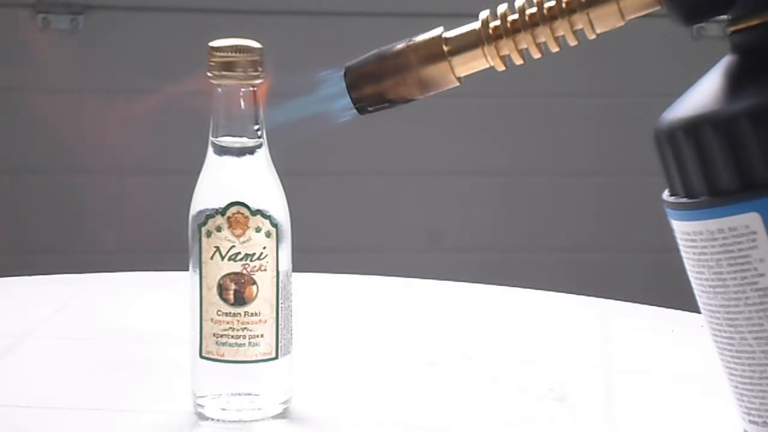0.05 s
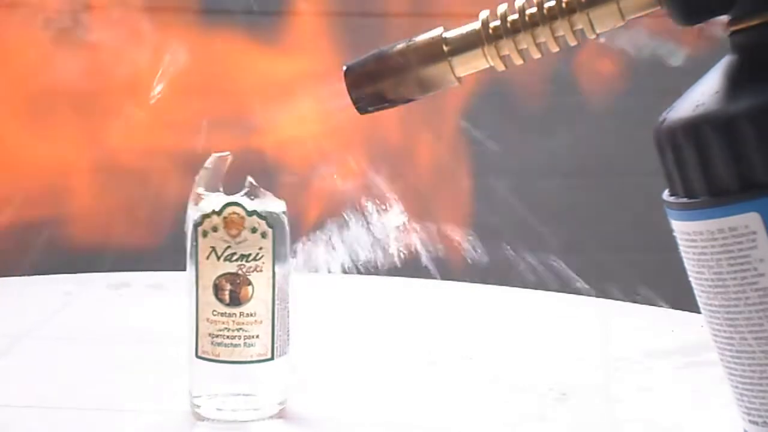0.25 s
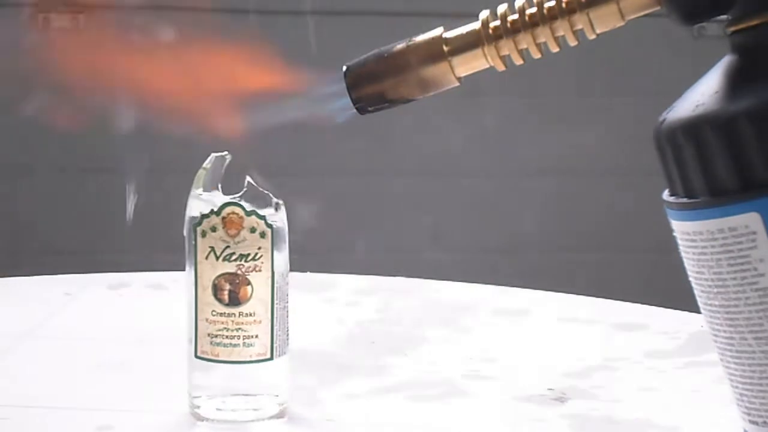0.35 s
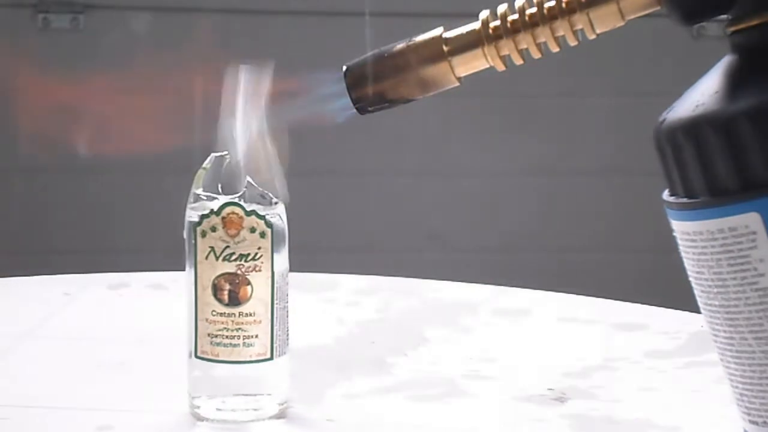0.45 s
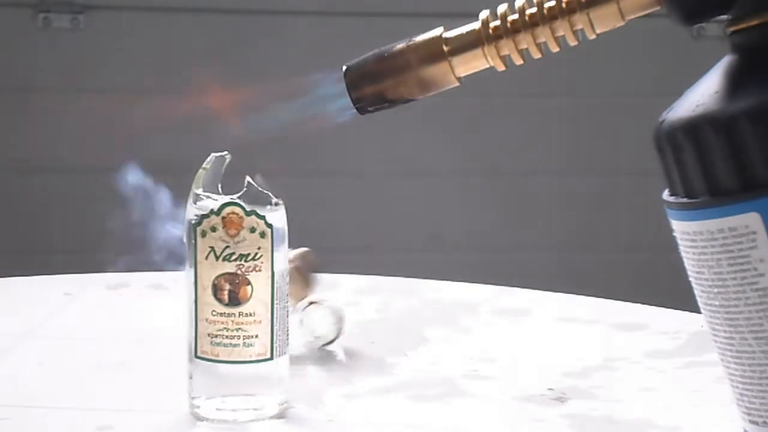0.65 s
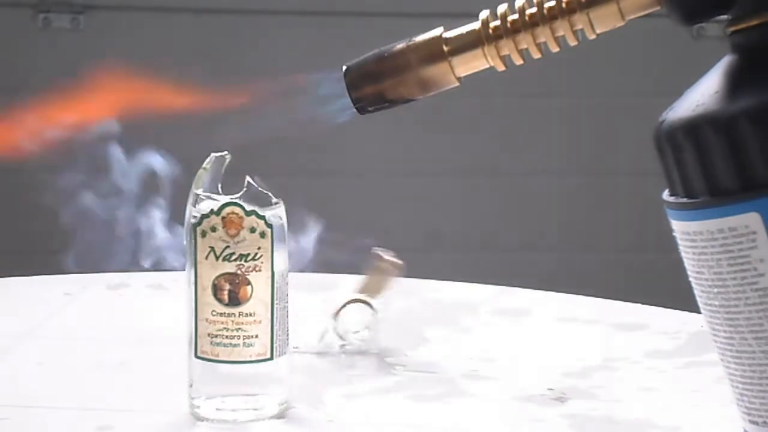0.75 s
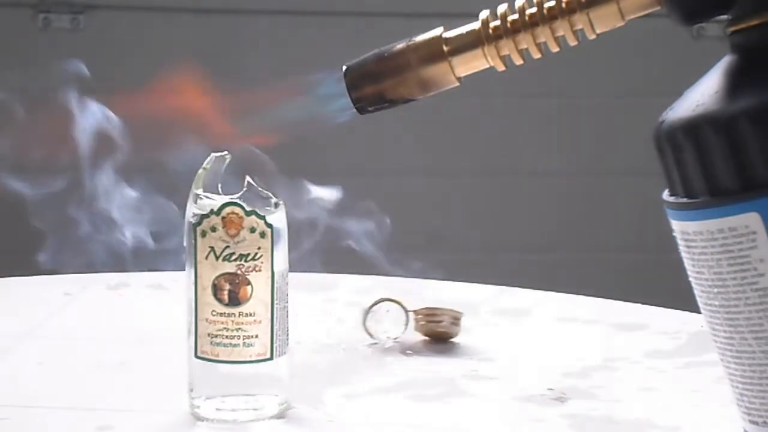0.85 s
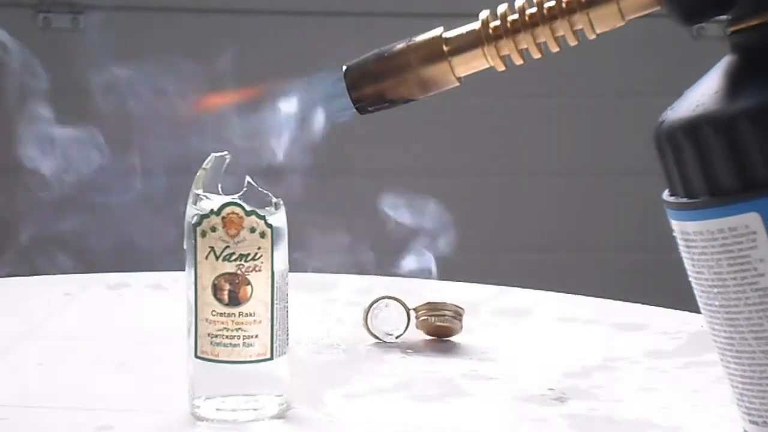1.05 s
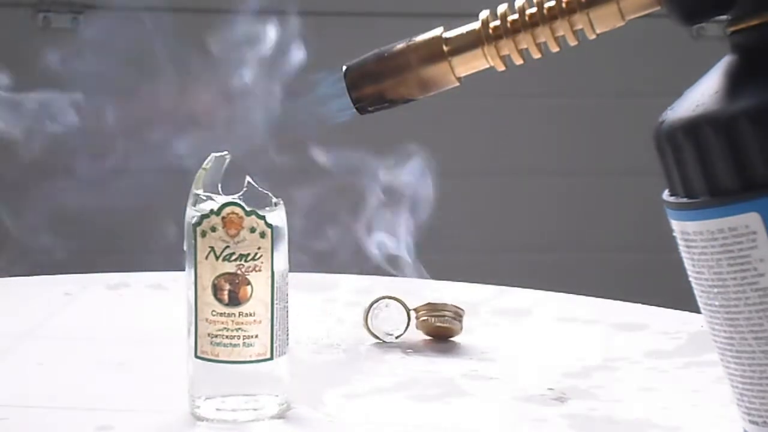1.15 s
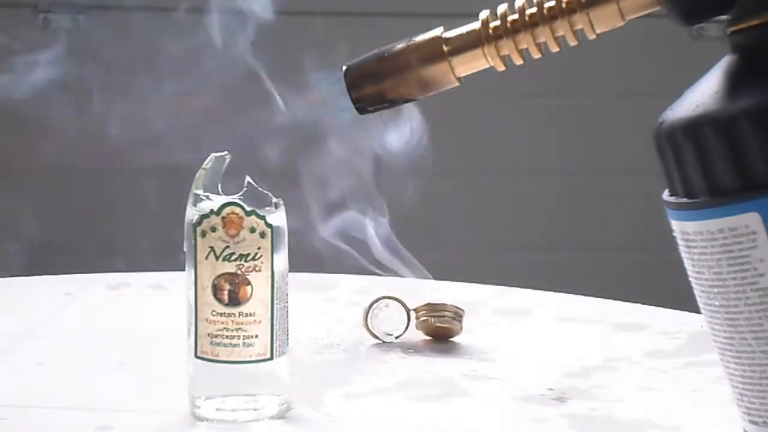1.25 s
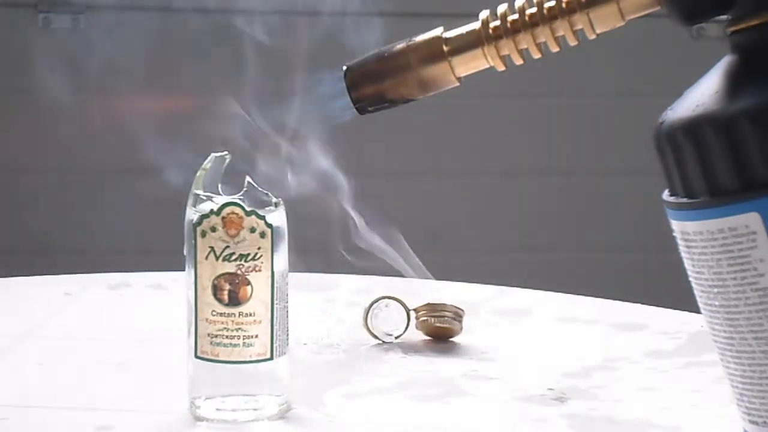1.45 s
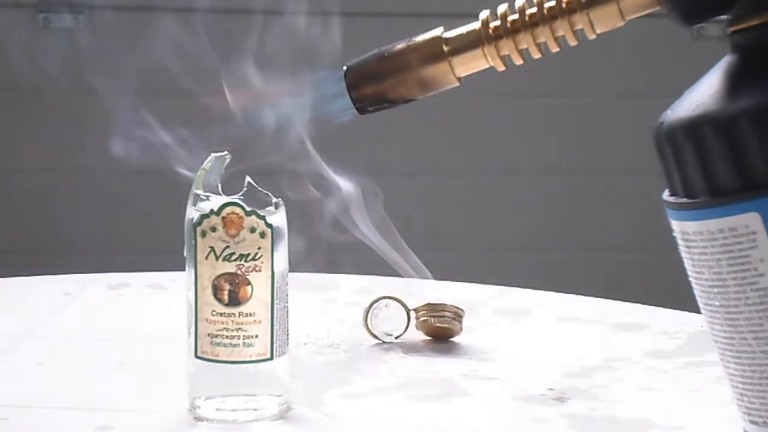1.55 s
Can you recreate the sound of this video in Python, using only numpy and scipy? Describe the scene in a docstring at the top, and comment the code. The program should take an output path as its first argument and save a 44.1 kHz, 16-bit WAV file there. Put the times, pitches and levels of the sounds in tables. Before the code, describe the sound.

One loud bang of bursting glass interrupts a softly roaring gas torch and echoes briefly through the room. Shards tick, the bottle neck knocks on a table, and spilt alcohol sizzles quietly near the microphone.

```python
"""A torch bursts a bottle

A gas torch roars and hisses against the neck of a small bottle of spirits until the neck bursts.
Vapour squeals and flares up, the bang echoes and dies away, and shards tick. The neck lands on the
table and bounces. The torch hisses on, spilt spirit flutters as it burns, and hot wet glass sizzles."""
import sys
import numpy as np
from scipy import signal
from scipy.fft import rfft, irfft
from scipy.io import wavfile
from scipy.ndimage import uniform_filter1d

SR = 44100
rng = np.random.default_rng(int(sys.argv[2]) if len(sys.argv) > 2 else 0)


def int16_out(signal):
    """Quantize to a 16-bit WAV file."""
    q = np.round(np.clip(np.atleast_2d(signal).T, -1, 1) * 32767)
    wavfile.write(sys.argv[1], SR, q.astype(np.int16))


N = 70560


def undb(db):
    return 10 ** (np.asarray(db) / 20)


def since(start):
    """Seconds since start, zero before it."""
    return np.maximum(np.arange(N) / SR - start, 0)


def fade(start, attack, decay):
    """A level that rises at start and dies away; all times in seconds."""
    return (1 - np.exp(-since(start) / attack)) * np.exp(-since(start) / decay)


def curve(points):
    """A level that glides through (seconds, dB) points and holds steady before and after them."""
    return undb(np.interp(since(0), *np.array(points).T))


def convolve(x, response):
    return signal.fftconvolve(x, response)[:N]


def colour(x, points):
    """Give a sound its tone: the (Hz, dB) points only set how strong each pitch is against the rest."""
    size = 8192
    hz, db = np.array(points).T
    shape = np.interp(np.log(np.fft.rfftfreq(size, 1 / SR) + 1), np.log(hz), db)
    # Build the filter so that nothing sounds ahead of a click.
    cepstrum = irfft(np.log(undb(shape)))
    cepstrum[1:size // 2] *= 2
    cepstrum[size // 2 + 1:] = 0
    response = irfft(np.exp(rfft(cepstrum)))
    return convolve(x, response / np.linalg.norm(response))


def noise():
    return rng.standard_normal(N)


def walk(rate):
    """A random wander that turns rate times a second."""
    step = int(SR / rate)
    return uniform_filter1d(np.repeat(noise()[:N // step + 1], step), step)[:N]


def clicks(times, sizes):
    """Single clicks at the given times."""
    return np.bincount(np.clip(np.asarray(times) * SR, 0, N - 1).astype(int), sizes, N)


def ring(start, notes):
    """A struck object rings with a few fading notes."""
    t = since(start)
    return sum(undb(db) * np.exp(-np.log(1000) * t / t60) * np.sin(2 * np.pi * hz * t)
               for hz, db, t60 in notes)


def room(x, wet_db, delay_s=0.015, t60_s=0.87):
    """Add the room's wash of echoes, which fades by 60 dB in t60_s."""
    response = noise() * fade(delay_s, .003, t60_s / np.log(1000))
    return x + undb(wet_db) * convolve(x, response / np.linalg.norm(response))


# The tone of the gas jet and of the flame. Each row: frequency in Hz, relative level in dB.
JET_TONE = [(300, -16), (1600, -8.5), (2400, -12.5), (3700, -8.5), (5000, -10.5), (6200, -12.5),
            (7500, -7.5), (9400, 0.5), (10400, 0), (11500, -16.5)]
ROAR_TONE = [(20, 2), (55, 6), (110, -1.5), (250, 1.5), (480, 1), (800, -5.5), (1300, -9), (1700, -19.5),
             (2200, -40), (4000, -47)]
# The burner tube's notes. Each row: pitch in Hz, filter width in Hz, relative level in dB.
TUBE_NOTES = [(3090, 550, 1.5), (4430, 440, 0)]
# How loud the jet and the tube are. Each row: time in seconds, level in dB.
JET_LEVELS = [(0, -49), (.21, -48), (.29, -81), (.57, -97.5), (.72, -59.5), (.95, -56), (1.3, -57.5),
              (1.6, -66)]
TUBE_LEVELS = [(0, -60.5), (.21, -57.5), (.3, -83.5), (.8, -70.5), (1.15, -72), (1.5, -74.5)]
BURST_S = .2111


def torch(roar_db=-38, swell_db_per_s=4.5, release_s=0.027):
    """The jet hisses and rings the burner tube; the flame roars on the neck as long as it stands."""
    jet = colour(noise(), JET_TONE) * undb(.5 * walk(40))
    tube = 0
    for hz, width, db in TUBE_NOTES:
        peak = signal.iirpeak(hz, hz / width, fs=SR)
        note = signal.lfilter(*peak, signal.lfilter(*peak, noise()))
        tube += undb(db + 1.8 * walk(25)) * note / note.std()
    swell_db = swell_db_per_s * np.minimum(since(0), BURST_S)
    roar = colour(noise(), ROAR_TONE) * undb(roar_db + swell_db + .7 * walk(46))
    roar *= np.exp(-since(BURST_S) / release_s)
    return jet * curve(JET_LEVELS) + tube * curve(TUBE_LEVELS) + roar


# Squeals of escaping vapour. Each row: start in seconds, final pitch in Hz,
# how far below that it begins as a fraction, level in dB, fade time in seconds.
VAPOUR_SQUEALS = [(0.166, 4120, 0.11, -38, 0.017), (0.225, 6120, .075, -35.5, 0.019),
                  (0.227, 5900, 0.041, -38.5, 0.012), (0.224, 5310, .01, -54, 0.064),
                  (0.225, 8920, 0.027, -31, 0.014), (0.226, 9460, 0.011, -47, 0.049)]


def squeals(rise_s=.018, attack_s=0.0046):
    """Vapour whistles through cracks, each tone sliding up as it fades."""
    out = 0
    for start, hz, rise, db, decay in VAPOUR_SQUEALS:
        pitch = hz * (1 - rise * np.exp(-since(start) / rise_s) + 0.0062 * walk(600))
        out += undb(db) * fade(start, attack_s, decay) * np.sin(2 * np.pi * np.cumsum(pitch) / SR)
    return room(out, wet_db=-15)


# Cracks running through the glass. Each row: start in seconds, relative level in dB.
GLASS_CRACKS = [(.2101, -15), (.2105, -11), (.2110, 0)]
# The glass's brief ring. Each row: pitch in Hz, level in dB, seconds to fade by 60 dB.
GLASS_NOTES = [(4750, -13.5, 0.0027), (7100, -13.5, 0.0022)]
# Echoes off nearby surfaces. Each row: delay in seconds, level in dB, treble cutoff in Hz.
NEAR_ECHOES = [(.0044, -19, 1793), (0.0137, -15.5, 1800)]
# The tone of a crack, of the bang's first scattered sound and of its long tail.
# Each row: frequency in Hz, relative level in dB.
CRACK_TONE = [(1200, -5), (2200, -15), (3000, -0.5), (4700, 0.5), (7100, -7), (9000, -14), (11000, -11)]
EARLY_TONE = [(25, 2), (70, 0), (150, 5.5), (400, 2), (800, -12), (1400, -9), (2200, -13.5), (5000, -26),
              (10000, -22.5)]
TAIL_TONE = [(25, 11.5), (100, -5.5), (300, 3.5), (700, -6), (1300, -5.5), (2200, -6.5), (3200, -19),
             (6000, -20), (10000, -35.5)]


def burst(build_s=0.00068, relax_s=0.00033, rebound=0.79, splinter_s=0.00073):
    """Pressure builds, flips and relaxes as the glass cracks; echoes and the tail of the bang follow."""
    t = since(0) - BURST_S
    wave = np.where(t < 0, -np.exp(-(t / build_s) ** 2 / 2), rebound * np.exp(-(t / relax_s) ** 2))
    wave = signal.sosfiltfilt(signal.butter(4, 1720, fs=SR, output="sos"), wave)
    starts, levels = np.array(GLASS_CRACKS).T
    cracks = clicks(starts, undb(levels + 2.5))
    splinters = undb(-19) * noise() * np.exp(-abs(t) / splinter_s)
    bang = undb(-1.5) * wave + colour(cracks + splinters, CRACK_TONE) + ring(BURST_S, GLASS_NOTES)
    echoes = 0
    for delay, db, cutoff_hz in NEAR_ECHOES:
        delayed = np.roll(bang, int(delay * SR))
        echoes += undb(db) * signal.lfilter(*signal.butter(2, cutoff_hz, fs=SR), delayed)
    early = undb(-20) * colour(noise() * fade(BURST_S, attack=0.0038, decay=0.014), EARLY_TONE)
    tail = undb(-43) * colour(noise() * fade(BURST_S, attack=0.014, decay=0.2), TAIL_TONE)
    return bang + echoes + early + tail


# First the bang's sharp echo, then shards landing. Each row: start in seconds, level in dB.
BRIGHT_CLICKS = [(.2243, -9), (0.2816, -17.5), (0.4046, -35.5), (0.4926, -27.5), (.5461, -40), (.7112, -17),
                 (0.715, -25)]
# The tone of these clicks. Each row: frequency in Hz, relative level in dB.
CLICK_TONE = [(600, -25), (2200, -15.5), (3300, -5), (4800, -1), (7000, 1), (10500, -2)]


def echo_and_shards():
    """The bang echoes off a nearby surface as one bright click; the later clicks are shards landing."""
    starts, db = np.array(BRIGHT_CLICKS).T
    return room(colour(clicks(starts, undb(db)), CLICK_TONE), wet_db=-13.5)


# How loud the fire and the sizzling drops are. Each row: time in seconds, level in dB.
FIRE_LEVELS = [(.2, -63), (.265, -37.5), (.33, -51), (.42, -68), (.75, -65.5), (.9, -55.5), (1.15, -50.5),
               (1.38, -51), (1.48, -49), (1.6, -46)]
SIZZLE_LEVELS = [(.25, -69.5), (.57, -77), (.7, -59.5), (.92, -57.5), (1.1, -60.5), (1.6, -55.5)]
# The tone of each. Each row: frequency in Hz, relative level in dB.
FIRE_TONE = [(12, -7.5), (30, -2.5), (60, -12.5), (110, -17.5), (220, -21.5), (450, -28.5), (1000, -38.5),
             (2500, -47.5)]
SIZZLE_TONE = [(300, -15), (1800, 3), (2600, -2), (4500, 0.5), (7000, 0.5), (10000, 6.5), (12000, -13)]


def spirit(pops_per_s=1500, spread_db=3):
    """Spilt spirit flares into a fireball, then burns with a low flutter and sizzles in tiny pops."""
    when, chance, sign = rng.random((int(pops_per_s * N / SR), 3)).T
    sizes = np.sign(sign - .5) * undb(-spread_db * np.log(chance + 0.00067))  # most pops are small
    pops = colour(clicks(when * N / SR, sizes), SIZZLE_TONE)
    fire = colour(noise(), FIRE_TONE) * curve(FIRE_LEVELS)
    return pops / pops.std() * curve(SIZZLE_LEVELS) + fire


# The neck lands on the table, then bounces. Each row: start in seconds, relative level in dB.
LANDING_HITS = [(0.5837, -14), (0.584, 3), (.5848, -3), (0.5864, -6), (0.5931, -6.5)]
BOUNCE_HITS = [(.7768, -43), (.7800, -58), (.789, -51)]
# The tone of the landing. Each row: frequency in Hz, relative level in dB.
KNOCK_TONE = [(60, -8), (200, 0.5), (360, 4), (750, -5), (1200, 0.5), (2000, 1.5), (3000, 3), (4000, -0.5),
              (8500, -2), (11000, -9.5)]
# The ring of table and neck at the hardest hit, and of the capped neck as it bounces.
# Each row: pitch in Hz, relative level in dB, seconds to fade by 60 dB.
CLACK_NOTES = [(1162, -32, 0.025), (1360, -36.5, .02), (3277, -41, 0.038)]
CAP_NOTES = [(3763, -8.5, 0.069), (4958, 0, 0.048), (5600, -9, 0.046), (9819, -12, 0.06)]


def neck(knock_db=-15.5, grit_db=-29, cap_db=-3):
    """The broken neck clacks on the table and sounds in the room, then bounces with a short ring."""
    out = 0
    for start, db in LANDING_HITS:
        grit = undb(grit_db) * noise() * fade(start, attack=.0001, decay=0.0019)
        out += undb(db) * colour(clicks([start], [undb(knock_db)]) + grit, KNOCK_TONE)
    hardest_s = max(LANDING_HITS, key=lambda hit: hit[1])[0]
    early = undb(-38.5) * fade(hardest_s, attack=.002, decay=0.0097)
    tail = undb(-50.5) * fade(hardest_s, attack=0.0053, decay=0.14)
    out += ring(hardest_s, CLACK_NOTES) + colour(noise() * (early + tail), KNOCK_TONE)
    for start, db in BOUNCE_HITS:
        scrape = colour(noise() * fade(start, attack=0.00011, decay=0.0048), SIZZLE_TONE)
        out += undb(db) * (undb(cap_db) * ring(start, CAP_NOTES) + scrape)
    return out


# How loud the tube's whistle is. Each row: time in seconds, level in dB.
WHISTLE_LEVELS = [(.9, -86.5), (1.3, -68), (1.55, -64.5)]


def whistle(hz=3070, waver=0.0278):
    """The flame settles on the lowest note of the burner tube, a thin wavering whistle."""
    pitch = hz * (1 + waver * walk(250))
    return curve(WHISTLE_LEVELS) * undb(2 * walk(40)) * np.sin(2 * np.pi * np.cumsum(pitch) / SR)


# Ticks of hot wet glass. Each row: start in seconds, relative level in dB, offset for its body in dB.
GLASS_TICKS = [(0.9273, -30, -24.5), (0.9387, -31.5, -22), (0.9637, -23.5, -32), (1.0355, -27.5, -28),
               (1.1662, -29, -26.5), (1.2042, -27, -33), (1.275, -24, -26), (1.2935, -19.5, -28),
               (1.3548, -29.5, -20), (1.3912, -32.5, -18), (1.4386, -17, -23), (1.5554, -35.5, -4.5),
               (1.5709, -33, -16)]
# The tone of a tick's bright snap and of its lower body. Each row: frequency in Hz, relative level in dB.
SNAP_TONE = [(1500, -22.5), (3000, -12.5), (5500, -9.5), (8000, 4.5), (10000, 7), (12000, -14.5)]
BODY_TONE = [(100, 2), (600, 5.5), (1800, 8), (3000, 4), (6000, -1.5)]


def ticks(snap_db=4, body_db=16, delay_s=0.0012):
    """Spirit makes single dry snaps on the hot glass."""
    starts, db, offset_db = np.array(GLASS_TICKS).T
    snap = colour(clicks(starts + delay_s, undb(db + snap_db)), SNAP_TONE)
    body = colour(clicks(starts + delay_s, undb(db + offset_db + body_db)), BODY_TONE)
    return room(snap + body, wet_db=-26)


def scene():
    mix = torch() + squeals() + burst() + echo_and_shards() + spirit() + neck() + whistle() + ticks()
    return mix[None]


def record(dry, mic_top_hz=11000, clip_level=.74, top_hz=14500):
    """The microphone loses the top treble, and the bang is so loud that its peaks are cut flat."""
    heard = signal.sosfiltfilt(signal.butter(14, mic_top_hz, fs=SR, output="sos"), dry)
    clipped = np.clip(heard, -clip_level, clip_level)
    return signal.sosfilt(signal.ellip(8, .2, 60, top_hz, fs=SR, output="sos"), clipped)


dry = scene()
out = record(dry)
int16_out(out)
```